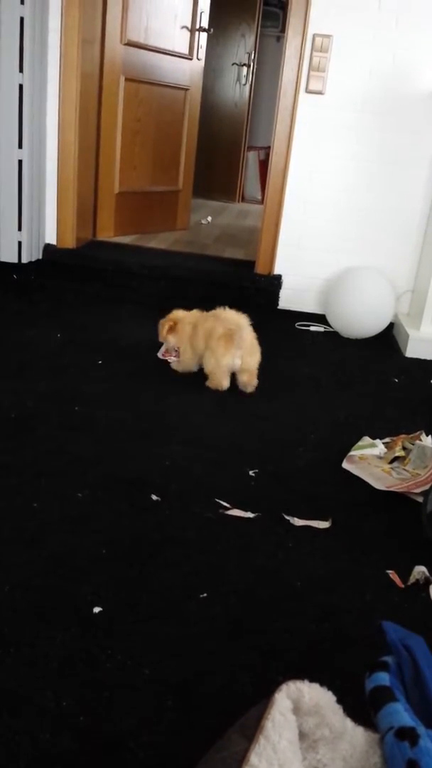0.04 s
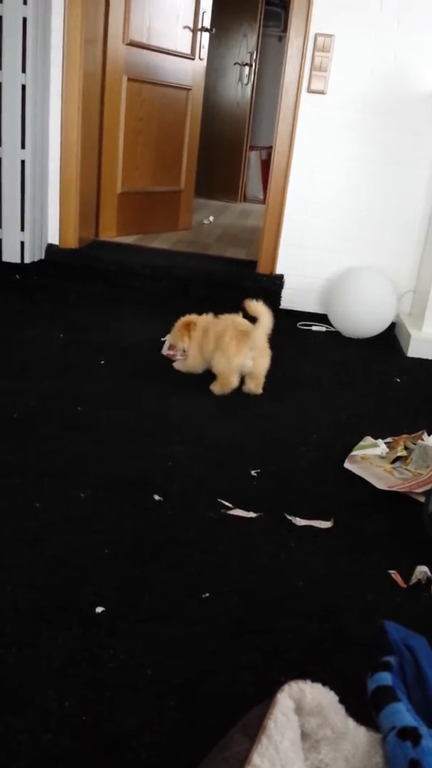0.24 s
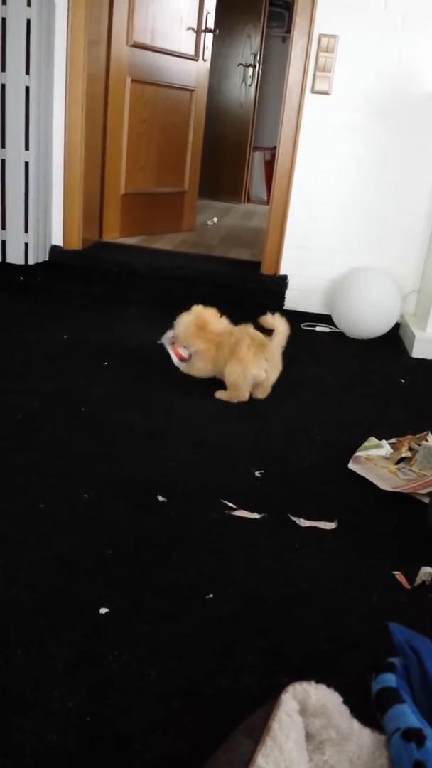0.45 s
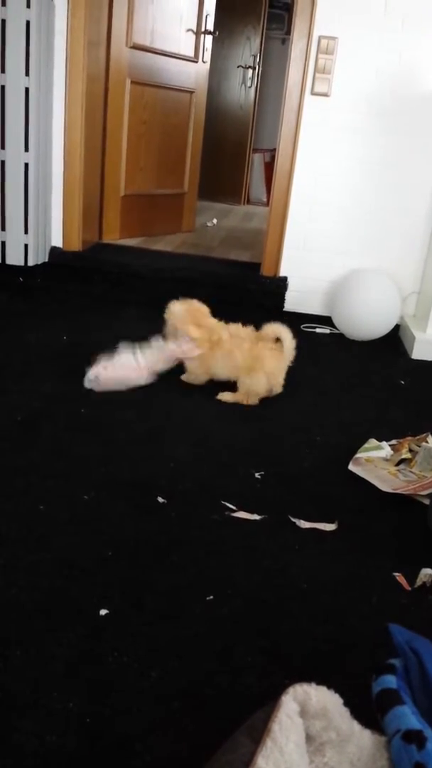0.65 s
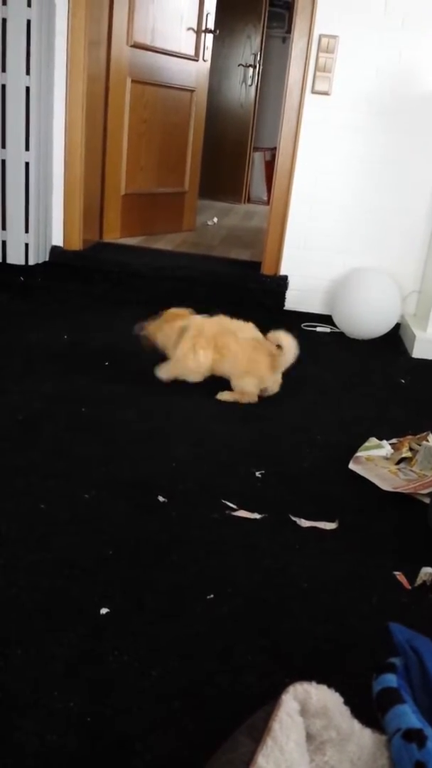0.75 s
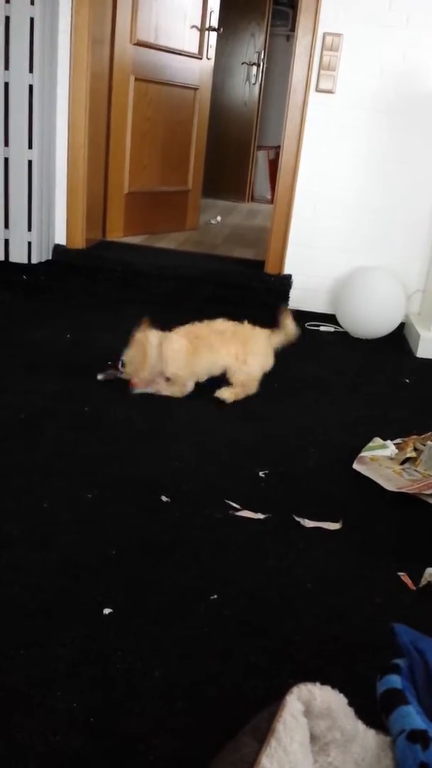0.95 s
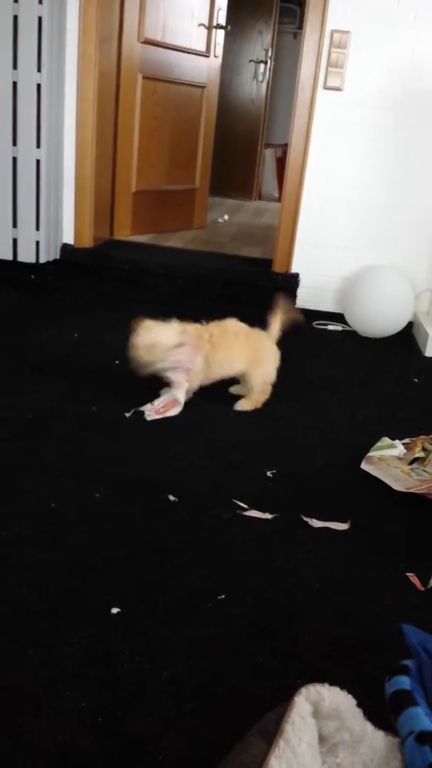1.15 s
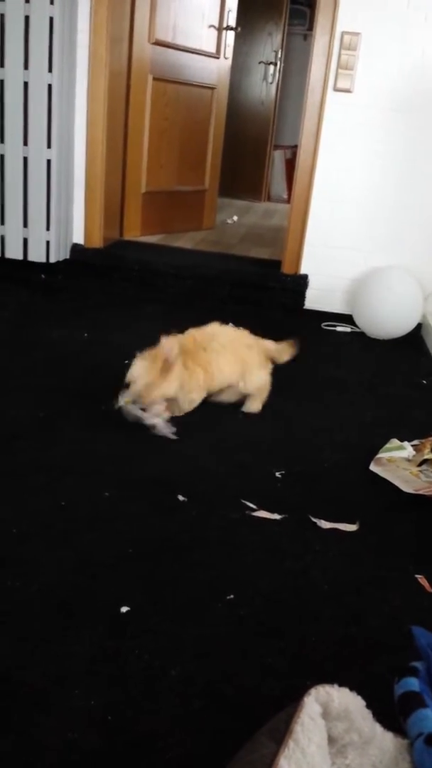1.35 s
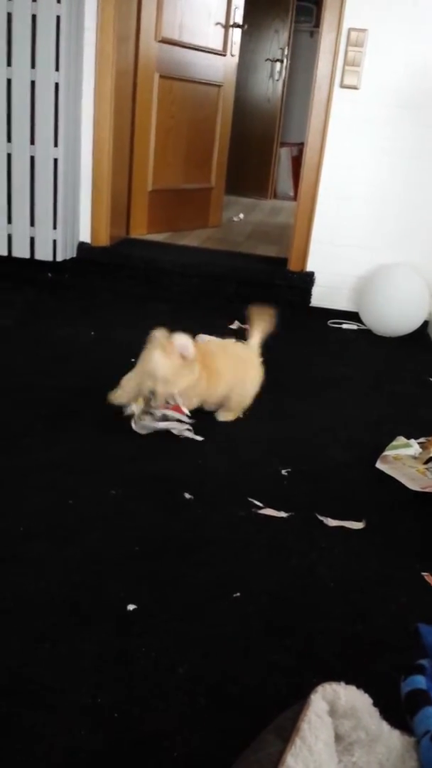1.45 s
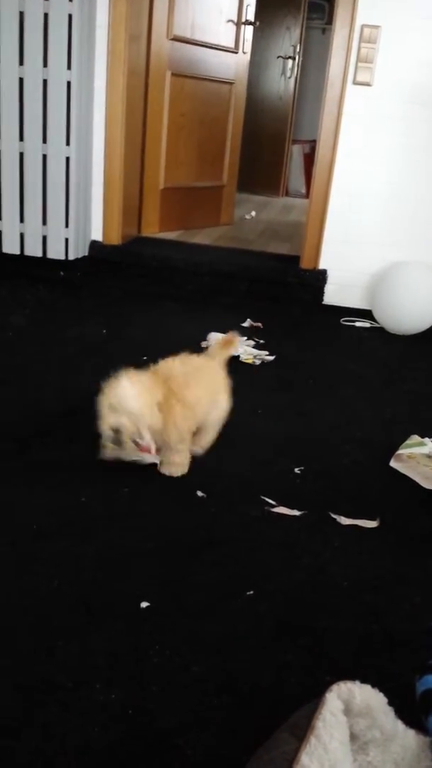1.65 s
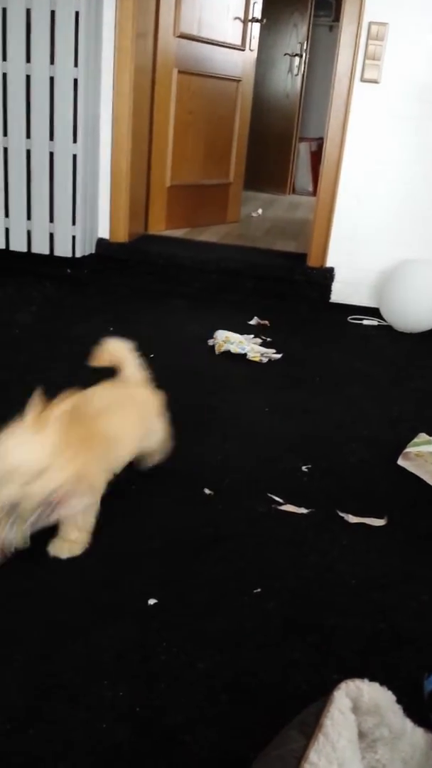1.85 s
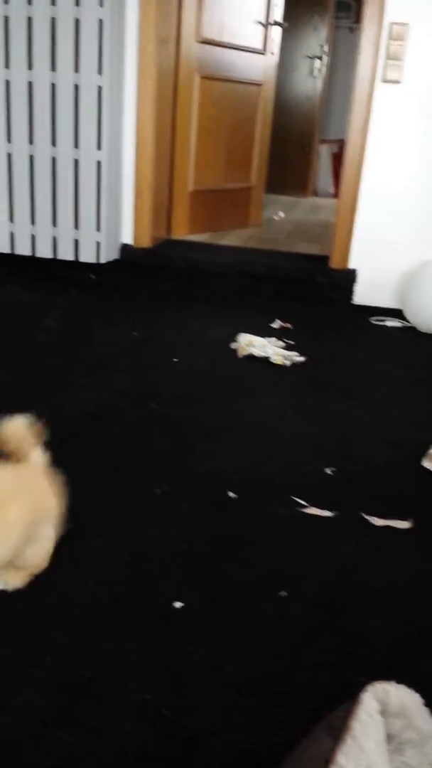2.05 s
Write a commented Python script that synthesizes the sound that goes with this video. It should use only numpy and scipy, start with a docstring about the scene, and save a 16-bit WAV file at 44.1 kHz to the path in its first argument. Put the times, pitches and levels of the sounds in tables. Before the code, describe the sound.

Paper crackling and scuffing on carpet, worked by a small puppy in a hard-walled, echoing room. Quick chirpy squeaks near the start, then sharper snaps and light paw thumps, over faint room tone, distant stereo microphone.

```python
"""Paper crackles and snaps, something squeaks in short high chirps and paws thud on the floor:
a puppy shakes and drags a wad of paper over a carpet in a hard-walled room that smears it all.
Crackle and scuff are dense trains of tiny noise bursts, snaps are single decaying bursts, squeaks
are gliding tones with an octave partial, and thuds are pad pushes over ringing floor modes.
Echoes made of decaying noise and a steady room tone surround them, heard by two microphone ports."""
import sys
import numpy as np
from scipy import signal
from scipy.io import wavfile
from scipy.ndimage import uniform_filter1d

SR = 44100
rng = np.random.default_rng(int(sys.argv[2]) if len(sys.argv) > 2 else 0)


def boost(x):
    """Linear amplitude factor 10**(x/20) for a level x in decibels (scalar or array-like)."""
    u = np.asarray(x, float) / 20
    return 10 ** u


def wrap_up_sound(samples):
    """Save the sound to the file named by the first command line argument, as 16-bit audio."""
    columns = np.atleast_2d(samples).T
    # keep every value between -1 and 1, then stretch to whole-number steps
    tamed = np.clip(columns, -1, 1)
    steps = np.round(tamed * 32767).astype(np.int16)
    wavfile.write(sys.argv[1], SR, steps)


N = 92610

# Colour of the steady room tone. Each row: frequency in Hz, relative level in dB.
AIR_COLOUR = [(25, -16), (50, -4), (100, -11.5), (300, 1.5), (700, -0.5), (1600, -6), (3000, -3),
              (6500, -6.5), (10000, -65), (14000, -34), (15000, -60)]
# How long the room rings. Each row: frequency in Hz, late decay time (t60) in seconds.
ROOM_DECAY = [(100, 0.45), (500, 0.25), (2000, 0.67), (4000, 0.66), (8000, 0.91), (14000, 0.32)]
# How alike left and right are in echoes and room tone. Each row: frequency in Hz, likeness from 0 to 1.
ROOM_LIKENESS = [(70, 1), (120, 1), (200, 0.68), (400, 0.85), (800, 0.54), (1500, 0.33), (4000, 0.017)]
# Ringing of the floor. Each row: frequency in Hz before detuning, level in dB, decay time (t60) in seconds.
FLOOR_RING = [(93.5, -1, 0.43), (135.5, -25.5, 0.45), (209.8, -2.5, 0.14), (299.2, -9, 0.21),
              (491, -6.5, 0.055), (780, -2, 0.076)]
# Paws landing. Each row: start in seconds, push of the pad in dB, deepest floor mode in dB,
# all upper floor modes in dB; the mode levels add to those of the floor.
PAW_LANDINGS = [(.005, -56, -43.5, -45), (0.502, -59, -71, -39), (0.576, -44.5, -53, -40.5),
                (0.782, -62, -55, -40), (0.877, -40, -41.5, -34), (0.932, -31, -51, -34),
                (0.989, -49, -41, -34.5), (1.04, -46, -38.5, -34), (1.169, -44, -46, -30),
                (1.266, -32.5, -51, -34), (1.377, -44, -43, -35), (1.489, -49, -39, -48),
                (1.521, -58, -42, -50), (1.57, -37, -40, -39.5), (1.626, -30.5, -33, -30),
                (1.665, -46, -51, -36.5), (1.689, -47, -48, -48), (1.774, -37, -29, -37),
                (1.816, -31, -48, -55), (1.839, -40, -44, -60), (1.925, -28.5, -47, -36),
                (1.967, -30, -32, -36.5), (1.989, -30, -41, -36), (2.015, -41, -43, -48),
                (2.058, -26, -48, -56)]
# Squeaks. Each row: start in seconds, length in seconds, first pitch in Hz, last pitch in Hz,
# level in dB before the mix, octave partial in dB relative to the fundamental, left minus right in dB.
CHIRPS = [(0, 0.14, 1075, 1008, -48.5, -20, -5), (.199, .022, 4170, 4950, -26, -10, 5),
          (0.202, 0.031, 4770, 4600, -31, -20, 0), (0.208, 0.038, 3555, 3580, -29.5, 3.5, 0),
          (.226, 0.054, 4318, 4740, -17.5, -21.5, 3.5), (0.269, 0.023, 4750, 5440, -17.5, -30, 2.5),
          (0.314, 0.0268, 4138, 3828, -17.5, -9.5, 5.5), (0.351, 0.0217, 4700, 5530, -21, -26, 3.0),
          (.355, 0.0208, 3712, 4287, -20, -14, 2), (0.389, 0.042, 997, 1012, -43, -24, 4),
          (0.534, 0.048, 1007, 1004, -44, -24, -4.5), (0.552, 0.03, 1385, 1487, -43, -13, 4),
          (0.978, 0.048, 2004, 2315, -38.5, -1, 4.0), (1.023, 0.0334, 2912, 3215, -31.5, 3.5, 4.0),
          (1.046, 0.032, 3937, 3508, -23.5, -2, 0.5), (1.248, 0.0112, 3450, 4100, -19.5, -5.5, 3),
          (1.248, 0.021, 4017, 4308, -18.5, -17, 9.5), (1.618, 0.031, 712, 708, -39, -20, 0.0),
          (1.686, .1, 1146, 909, -53, -22, -3), (1.816, 0.0145, 2634, 3540, -35, -23, 1),
          (1.94, 0.0027, 3150, 3250, -40, -25, 0.0)]
# Single sharp snaps of the paper. Each row: start in seconds, peak in dB, brightness in dB per octave,
# decay time constant in seconds.
PAPER_SNAPS = [(.1705, -21, 0, .0012), (.7272, -23, 4, .0012), (.7345, -21, 1, .0015),
               (.7911, -19, 6, .0012), (.8904, -18, 6, .0015), (1.008, -17, 2, .0015),
               (1.1897, -14, 5, .0015), (1.38, -17, 1, .002), (1.5394, -24, 3, .003),
               (1.5544, -21, 1, .002), (1.5678, -21, 2, .002), (1.6127, -20, 2, .002),
               (1.8168, -18, -2, .008), (1.8265, -19, -2, .003), (1.9594, -26, -2, .002),
               (1.9909, -22, 2, .0015), (2.0053, -21, 0, .002)]
# Colour of the crackling paper. Each row: frequency in Hz, relative level in dB.
CRACKLE_COLOUR = [(530, -28.5), (900, -11.5), (1040, -15), (1100, -9), (1330, -9), (1820, -4), (2200, -2),
                  (3220, -4), (6650, 2.5), (8650, -9), (13900, -32), (14800, -13), (15500, -59)]
# Colour of the dull scuff on the carpet. Each row: frequency in Hz, relative level in dB.
SCUFF_COLOUR = [(60, -10.5), (150, -3.5), (300, -6), (700, 1), (1300, -2), (2200, -8), (4000, -20)]
# How hard the paper is worked. Each row: start in seconds, overall level in dB, then, relative to
# that, dull scuff on the carpet in dB, papery body in dB, top fizz in dB.
SHAKING = [(0.0, -37, -4, -1.5, -20), (0.15, -63, 0, -26, -5), (0.18, -45.5, -25, 2, -1.5),
           (0.27, -54, -23, 1, 4.5), (0.29, -39, -8, -25, -22), (0.3, -45, -8, -1, -7),
           (0.35, -44, -12, -5.5, -5), (0.37, -35.5, -23, -4, -16), (0.38, -42.5, 0.5, -8, -6),
           (0.41, -41.5, -5, -2.5, -5), (0.51, -34.5, -10, -9, -10), (0.58, -53, -0.5, -1, -9),
           (0.61, -52.5, -2.5, 3, -12), (0.72, -47.5, -2.5, -6, -4), (0.74, -41.5, -4.5, -18, -26),
           (0.78, -46, 5, 0.5, -13), (0.81, -39.5, -12, -1.5, -18), (0.88, -48, -1.5, -3, -24),
           (0.92, -30.5, -1, -6.5, -11), (1.02, -42.5, -4.5, -0.5, -12), (1.05, -37.5, -0.5, -10, -5),
           (1.12, -41.5, -6, -4, -22), (1.2, -36.5, -6.5, -2, -8.5), (1.26, -36, -11, -1, -4.5),
           (1.29, -35.5, -11.5, -10.5, -18), (1.34, -41, -10, -1, -4.5), (1.4, -36.5, -3.5, -4, -7),
           (1.52, -75, -8, -4, -2), (1.56, -38, -9, -6, -7), (1.64, -39.5, -5, -3, -15),
           (1.8, -63.5, 8.5, -4, -7), (1.82, -41.5, -6, -2, -11), (1.92, -77, -23, -26, -5),
           (1.92, -58.5, 5, -2, -3), (1.98, -42.5, -2, -2.5, -8.5), (2.1, -55, -11, -9, -10)]
# Difference between the microphone ports. Each row: frequency in Hz, left minus right in dB.
PORT_DIFFERENCE = [(60, -6.5), (100, 0.5), (180, -1), (310, 4), (550, -6.5), (950, 2.5), (1650, 1),
                   (2860, 8), (4970, 1), (8640, -5.5), (15000, -17)]
# Roll-off shared by both ports. Each row: frequency in Hz, gain in dB.
MIC_RESPONSE = [(20, -8), (45, -3), (80, 0.0), (14700, -1.5), (15200, -29), (16000, -49)]

AIR_DB = -49
FIRST_ECHO_S, EARLY_T60_S, EARLY_DB = 0.003, 0.16, 11.0
PAD_S, FLOOR_SWELL_S = 0.0008, 0.0059  # the floor takes a moment to start ringing
SQUEAK_RISE_S, SQUEAK_FALL_S = 0.0035, 0.0056
SQUEAK_FLUTTER_HZ, SQUEAK_RASP = 48, 0.33  # rms pitch flutter, rms share of level
CREASE_S = 0.00064  # decay time constant of each tiny burst
CREASES_PER_S, CREASE_SPREAD_DB = 2500, 4.5
SCUFFS_PER_S, SCUFF_SPREAD_DB = 600, 3
BODY_BELOW_HZ, FIZZ_ABOVE_HZ = 3800, 9000
CRACKLE_DB, SCUFF_DB = 2, -1.5
SQUEAK_DIRECT_DB = -1.5
PAPER_ROOM_DB, SNAP_ROOM_DB, SQUEAK_ROOM_DB, PAW_ROOM_DB = 4.0, -2.0, 3.5, -6  # sends to the room
PORT_LAG_S = 0.0003  # left hears the direct sound later


def evened(x):
    """Scales to rms 1."""
    return x / np.sqrt(np.mean(x ** 2) + 1e-20)


def read(points, hz):
    """Reads a table of frequencies and values along a log frequency axis."""
    f, value = np.transpose(points)
    return np.interp(np.log(hz + 1), np.log(f + 1), value)


def add(mix, s, sound):
    """Mixes a sound in at time s."""
    part = mix[..., round(s * SR):][..., :sound.shape[-1]]
    part += sound[..., :part.shape[-1]]


def taps(points_db):
    """Makes a causal minimum-phase filter with the given colour."""
    gain_db = read(points_db, abs(np.fft.fftfreq(4096, 1 / SR)))
    log_gain = np.log(boost(np.maximum(gain_db, -100)))
    spectrum = np.exp(log_gain - 1j * signal.hilbert(log_gain).imag)
    return np.fft.ifft(spectrum).real[:2048]


def pair(same, frames, size):
    """Draws random short-time spectra for two channels, with likeness `same` per bin."""
    a, b, c, d = rng.standard_normal((frames, size // 2 + 1, 4)).T
    same = np.clip(same, -1, 1)[:, None]
    left, other = a + 1j * b, c + 1j * d
    return np.array([left, same * left + np.sqrt(1 - same ** 2) * other])


def air():
    """Steady room tone: coloured noise, more alike in the two channels at low frequencies."""
    hz = np.fft.rfftfreq(2048, 1 / SR)
    spectra = pair(read(ROOM_LIKENESS, hz), N // 512 + 5, size=2048)
    spectra = spectra * boost(read(AIR_COLOUR, hz))[:, None]
    noise = signal.istft(spectra, nperseg=2048, noverlap=1536)[1][:, :N]
    return boost(AIR_DB) * evened(noise)


def tail():
    """One echo pattern: noise dying band by band, with nearby walls and floor first and loudest."""
    hz, t = np.fft.rfftfreq(256, 1 / SR), np.arange(520) * 64 / SR
    late = boost(-60 * t / read(ROOM_DECAY, hz)[:, None])
    early = boost(EARLY_DB - 60 * t / EARLY_T60_S)
    spectra = pair(read(ROOM_LIKENESS, hz), 520, size=256) * (late + early)
    echo = signal.istft(spectra, nperseg=256, noverlap=192)[1]
    echo = np.pad(echo, ((0, 0), (round(FIRST_ECHO_S * SR), 0)))
    return echo / np.linalg.norm(echo[0])  # left energy 1


def room(x):
    """The source moves, so three echo patterns take turns at constant total power."""
    t = np.arange(N) / SR
    wet = np.zeros((2, N))
    for k in range(3):
        turn = np.sqrt(2 / 3) * np.sin(np.pi * (t * 4 + k / 3))
        wet += signal.fftconvolve(x * turn, tail(), axes=1)[:, :N]
    return wet


def paws():
    """Each pad gives a soft push, and slightly detuned floor modes swell and ring away."""
    out, t = np.zeros(N), np.arange(SR // 2) / SR
    push = -(t / PAD_S) * np.exp(1 - t / PAD_S) * 2 * (1 - t / (2 * PAD_S))
    swell = 1 - np.exp(-t / FLOOR_SWELL_S)
    detune = rng.uniform(1.0, 1.03, (len(PAW_LANDINGS), len(FLOOR_RING)))
    for (at, push_db, deep_db, upper_db), shift in zip(PAW_LANDINGS, detune):
        ring = np.zeros(len(t))
        for k, (hz, mode_db, t60) in enumerate(FLOOR_RING):
            level_db = mode_db + (upper_db if k else deep_db)
            ring += boost(level_db - 60 * t / t60) * np.sin(2 * np.pi * hz * shift[k] * t)
        add(out, at, boost(push_db) * push + ring * swell)
    return out[None]


def flutter(width):
    """Fast random flutter for each squeak: noise smoothed twice over `width` samples, rms 1 overall."""
    noise = rng.standard_normal((len(CHIRPS), SR // 4))
    return evened(uniform_filter1d(uniform_filter1d(noise, width), width))


def squeaks():
    """Short gliding whistles with an octave partial, roughened in pitch and strength by fast flutter."""
    out = np.zeros((2, N))
    for row, pitch_flutter, rasp in zip(CHIRPS, flutter(50), flutter(40)):
        at, length, first_hz, last_hz, db, octave_db, pan_db = row
        t = np.arange(0, length, 1 / SR)
        glide = first_hz + (last_hz - first_hz) * t / length
        hz = glide + SQUEAK_FLUTTER_HZ * pitch_flutter[:len(t)]
        phase = 2 * np.pi * np.cumsum(hz) / SR
        ramp = np.minimum(t / SQUEAK_RISE_S, (length - t) / SQUEAK_FALL_S)
        edge = np.sin(np.pi / 2 * np.clip(ramp, 0, 1)) ** 2
        tone = np.sin(phase) + boost(octave_db) * np.sin(2 * phase)
        tone = edge * (1 + SQUEAK_RASP * rasp[:len(t)]) * tone
        sides_db = db + np.array([[pan_db], [-pan_db]]) / 2
        add(out, at, boost(sides_db) * tone)
    return out


def snaps():
    """Single folds give way in a short decaying burst, tilted brighter or duller than the crackle."""
    out, t = np.zeros(N), np.arange(2048) / SR
    for at, db, tilt_db, length in PAPER_SNAPS:
        burst = rng.standard_normal(2048) * np.exp(-t / length)
        colour = taps([(f, v + tilt_db * np.log2(f / 5000)) for f, v in CRACKLE_COLOUR])
        snap = signal.oaconvolve(burst, colour)
        add(out, at, boost(db) * snap / abs(snap).max())
    return out[None]


def clicks(per_s, spread_db):
    """A dense random train of tiny decaying noise bursts, a few of them large."""
    size = boost(spread_db * np.minimum(rng.exponential(1, N), 4))
    hits = size * (rng.random(N) < per_s / SR)
    envelope = signal.lfilter([1], [1, -np.exp(-1 / (CREASE_S * SR))], hits)
    return envelope * rng.standard_normal(N)


def paper():
    """Creases crackle and the wad scuffs the carpet as hard as it is shaken."""
    t, (s, *levels_db) = np.arange(N) / SR, np.transpose(SHAKING)
    overall, scuff_level, body_level, fizz_level = [boost(np.interp(t, s, db)) for db in levels_db]
    crackle = signal.oaconvolve(clicks(CREASES_PER_S, CREASE_SPREAD_DB), taps(CRACKLE_COLOUR))[:N]
    scuff = signal.oaconvolve(clicks(SCUFFS_PER_S, SCUFF_SPREAD_DB), taps(SCUFF_COLOUR))[:N]
    low_pass = signal.butter(N=3, Wn=BODY_BELOW_HZ, fs=SR, output="sos")
    high_pass = signal.butter(N=3, Wn=FIZZ_ABOVE_HZ, btype="high", fs=SR, output="sos")
    body = signal.sosfiltfilt(low_pass, crackle)
    fizz = signal.sosfiltfilt(high_pass, crackle)
    out = boost(CRACKLE_DB) * evened(crackle - body - fizz)  # the middle band
    out += boost(SCUFF_DB) * scuff_level * evened(scuff)
    out += body_level * evened(body)
    out += fizz_level * evened(fizz)
    return (overall * out)[None]


def scene():
    """Direct sound, slightly late on the left, plus the room's echoes and its tone."""
    rustle, snap, squeak, paw = paper(), snaps(), squeaks(), paws()
    direct = rustle + snap + boost(SQUEAK_DIRECT_DB) * squeak + paw
    lag = round(PORT_LAG_S * SR)
    direct = np.array([np.pad(direct[0], (lag, 0))[:N], direct[1]])
    wet = boost(PAPER_ROOM_DB) * rustle + boost(SNAP_ROOM_DB) * snap
    wet = wet + boost(SQUEAK_ROOM_DB) * squeak + boost(PAW_ROOM_DB) * paw
    return direct + room(wet) + air()


def top_cut(x):
    """Nothing passes above the cut-off."""
    return signal.sosfilt(signal.butter(12, 15690, fs=SR, output="sos"), x)


def record(dry):
    """The two microphone ports differ in colour and share a bass and treble roll-off."""
    ports = []
    for side in (1, -1):  # left, right
        colour = taps([(f, side * db / 2) for f, db in PORT_DIFFERENCE])
        ports.append(np.convolve(colour, taps(MIC_RESPONSE)))
    mix = signal.fftconvolve(dry, np.array(ports), axes=1)[:, :N]
    return top_cut(mix)


dry = scene()
out = record(dry)
wrap_up_sound(out)
```